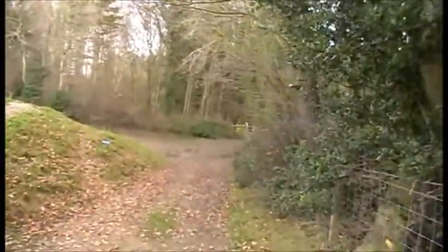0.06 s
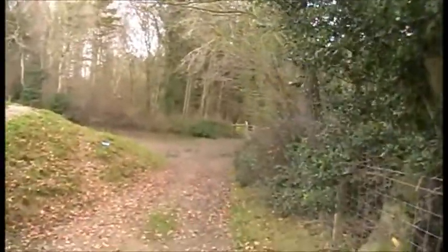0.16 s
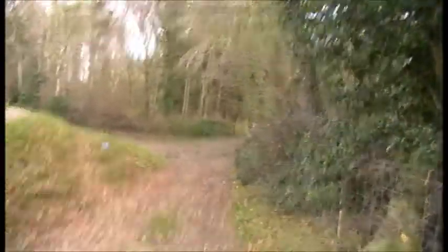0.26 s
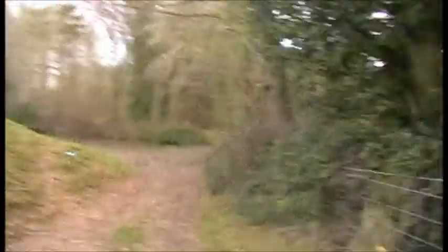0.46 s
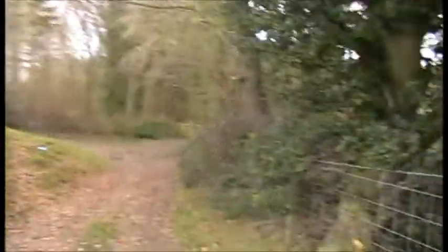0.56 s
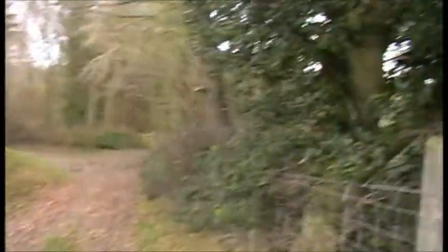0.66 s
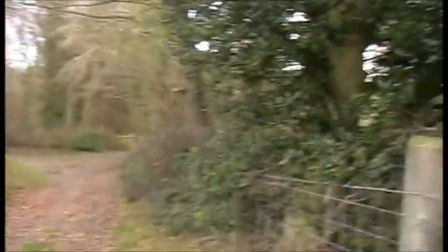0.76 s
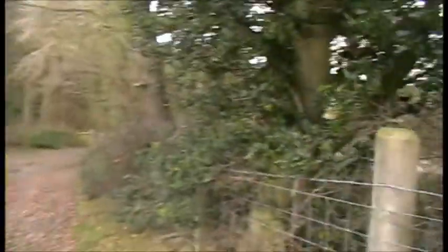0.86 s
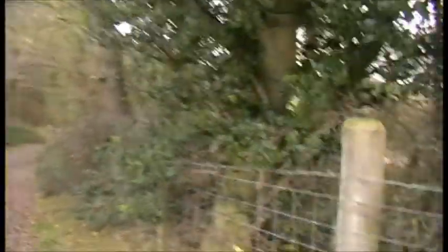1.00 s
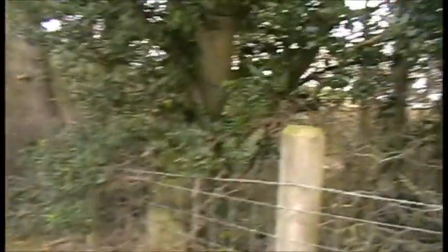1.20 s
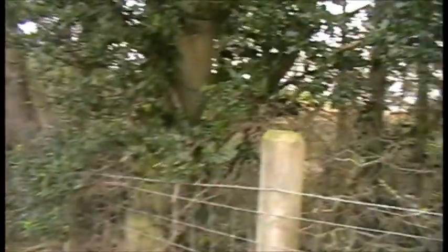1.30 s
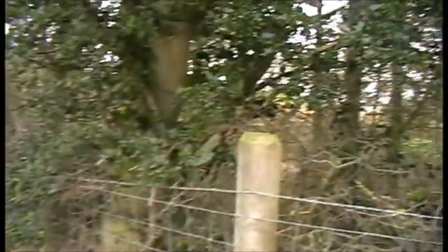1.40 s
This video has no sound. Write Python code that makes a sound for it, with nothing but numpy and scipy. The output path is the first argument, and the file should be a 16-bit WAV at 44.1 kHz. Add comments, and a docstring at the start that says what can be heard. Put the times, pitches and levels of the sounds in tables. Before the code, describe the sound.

A large bird's wings thrash out of stiff evergreen leaves with crackles, twig snaps and dull branch thuds, then beat quickly in clear slapping flaps, fading into quiet woodland air; close outdoor stereo camera microphone, slightly dull treble.

```python
"""Large bird leaving a thicket

A large bird bursts out of an evergreen thicket beside a woodland track and flies off.
Its wings thrash leaves (filtered crackle) and thud against branches (damped sines). Each wingbeat
is a push of air (a windowed cosine) and two feather slaps (damped modes) with quill chirps and rasps.
Leaves settle and twigs tick (noise bursts); the trunks scatter it all back (convolution with decaying
crackle) over the quiet air of the wood (coloured noise).
"""
import sys
import numpy as np
from scipy import signal
from scipy.fft import rfft, irfft
from scipy.io import wavfile

SR = 44100
rng = np.random.default_rng(int(sys.argv[2]) if len(sys.argv) > 2 else 0)


def persist_wave(psi):
    """Save psi, clipped to +-1, as 16-bit WAV."""
    counts = np.round(np.clip(psi, -1, 1) * 32767).astype(np.int16)
    wavfile.write(sys.argv[1], SR, np.atleast_2d(counts).T)


N = 63945  # samples
TIME = np.arange(N) / SR  # s


def undb(db):
    """Logarithmic level: decibels to amplitude gain."""
    return 10 ** (np.asarray(db) / 20)


def unit(x):
    """Normalisation: scale to rms 1."""
    return x / np.sqrt(np.mean(x ** 2) + 1e-20)


def follow(table, at):
    """Linear interpolation of a two-column table."""
    return np.interp(at, *np.array(table).T)


def colour(x, points, share=1):
    """Linear filtering: a spectrum drawn through (Hz, dB) points, straight in log frequency."""
    hz, db = np.array(points, float).T
    f = np.fft.rfftfreq(2 * N, 1 / SR) + 1  # the 1 avoids log of zero
    gain = undb(share * np.interp(np.log(f), np.log(hz), db))
    return irfft(rfft(x, 2 * N) * gain)[..., :N]


def band(x, hz, width):
    """Resonance: one peak whose quality factor is centre over width."""
    b, a = signal.iirpeak(min(hz, SR * .45), hz / width, fs=SR)
    return signal.lfilter(b, a, x)


def since(start):
    """Causality: seconds since an event, zero before it."""
    return np.maximum(TIME - start, 0)


def decay(age, t60):
    """Exponential damping: a fall of 60 dB in t60 seconds."""
    return np.exp(-np.log(1000) * age / t60)


def ring(start, hz, t60):
    """Damped oscillation: a struck, fading vibration."""
    age = since(start)
    return np.sin(2 * np.pi * hz * age) * decay(age, t60)


def crackle(per_s, spread_db, hiss):
    """Random impulse process: dense clicks of scattered size over some hiss; rms 1."""
    size = undb(spread_db * np.minimum(rng.exponential(size=N), 4))
    happens = rng.random(N) < per_s / SR
    clicks = happens * size * rng.choice([-1, 1], N)
    return unit(unit(clicks) + hiss * rng.standard_normal(N))


# Sideways spread of leaves, echoes and air. Each row: frequency in Hz, side gain in dB.
SPREAD = [(100, -12), (300, -6.5), (700, -1), (1500, 1), (8000, -3), (15000, 5)]


def wide(mid, side, side_db):
    """Mid-side stereo: the side signal is added left and subtracted right; the bass stays narrow."""
    return mid + undb(side_db) * colour(side, SPREAD) * np.array([[1], [-1]])


PUSH_HZ, PUSH_WIDTH_S = 148, 0.0028  # nominal pitch and Gaussian width, before the speed varies


def push(at):
    """Pressure pulse: air squeezed and released by a passing wing, never quite at the same speed."""
    u = (TIME - at) * (1 + .1 * rng.standard_normal())
    return np.cos(2 * np.pi * PUSH_HZ * u) * np.exp(-.5 * (u / PUSH_WIDTH_S) ** 2)


# Modes of the slapped wing. Each row: frequency in Hz before detuning, level in dB,
# 60 dB decay time in s before the slap's own scaling.
WING = [(208, -7.5, 0.024), (418.7, -1.5, 0.028), (595.5, 0, 0.024), (745, -1.5, 0.0087)]
SLAP_RISE_S, GROUND_S, GROUND_DB = 0.0021, 0.0055, -17  # ground delay is the mean


def slap(at, t60_scale):
    """Modal vibration and reflection: the wing fills and rings, and the ground returns it."""
    detune = 1 + .07 * rng.standard_normal(len(WING))

    def sound(start):
        """Superposition: the sum of the wing's modes with a soft onset."""
        modes = sum(undb(db) * ring(start, hz * factor, t60 * t60_scale)
                    for (hz, db, t60), factor in zip(WING, detune))
        return (1 - np.exp(-since(start) / SLAP_RISE_S)) * modes

    ground_delay = GROUND_S * (1 + 0.16 * rng.standard_normal())
    return sound(at) + undb(GROUND_DB) * sound(at + ground_delay)


# The quills' pitch drops as the bird eases off. Each row: time in s, pitch factor.
QUILL_PITCH = [(.3, .97), (1, 1.02), (1.22, .89)]
# Nominal starting pitch in Hz, its fall per second, and the flick's time scale in s.
FLICK_HZ, FLICK_FALL_PER_S, FLICK_S = 4005, 56, 0.0012


def flick(at, pitch, rasp_db, rasp_s):
    """Stick-slip friction: quills zip over each other in a falling chirp, then rasp."""
    age = since(at - FLICK_S)
    pitch = pitch * follow(QUILL_PITCH, at)
    start_hz = FLICK_HZ * pitch * (1 + 0.044 * rng.standard_normal())
    hz = start_hz * np.exp(-FLICK_FALL_PER_S * age)
    envelope = np.exp(-((TIME - at - .0005) / FLICK_S) ** 2)
    chirp = np.sin(2 * np.pi * np.cumsum(hz) / SR) * envelope
    grains = crackle(per_s=1400, spread_db=-0.5, hiss=0.36)
    rasp = unit(band(band(grains, 3400 * pitch, 1000), 3550 * pitch, 1600))
    return chirp + undb(rasp_db) * rasp * (1 - np.exp(-age / FLICK_S)) * np.exp(-age / rasp_s)


# Wingbeats. Each row: time of the snap in s, then levels in dB of the air push, first slap,
# first quill flick, snap and second quill flick; the slap and snap are muffled afterwards.
BEATS = [(0.2311, -47, -47, -58, -31, -48), (.2900, -37, -26.5, -56, -22, -29.5),
         (0.3824, -34.5, -49, -32, -18.5, -26), (0.4545, -32.5, -33, -54, -26, -35),
         (0.5456, -33, -21, -36, -21.5, -35.5), (0.618, -34, -26.5, -39, -23, -42.5),
         (.6890, -35.5, -23, -46, -29, -31.5), (.7630, -34, -30, -36.5, -21, -30),
         (.8370, -33, -30, -35, -22, -33), (0.9105, -31.5, -26.5, -37.5, -29.5, -39.5),
         (0.9851, -32, -24, -33.5, -17.5, -27), (1.061, -37.5, -51, -34, -18.5, -32),
         (1.1371, -37.5, -60, -36.5, -27, -34.5), (1.2169, -42.5, -44, -39, -30, -37.5),
         (1.296, -51, -55, -106, -60, -65)]
# Soft feathers muffle the slaps. Each row: frequency in Hz, gain in dB.
MUFFLE = [(680, 0), (900, -2), (1300, -5), (2500, -8)]
SLAP_LEAD_S, PUSH_LEAD_S = .015, 0.01283  # ahead of the snap
REBOUND_S, REBOUND_DB = 0.01932, -4.5  # after the push and relative to it


def wings():
    """Superposition: a push of air and its inverted rebound, a first slap, then the snap."""
    air, slaps, quills = np.zeros((3, N))
    for at, push_db, first_db, first_flick_db, snap_db, flick_db in BEATS:
        pushed = at - PUSH_LEAD_S
        first = at - SLAP_LEAD_S
        air += undb(push_db) * (push(pushed) - undb(REBOUND_DB) * push(pushed + REBOUND_S))
        slaps += undb(first_db) * slap(first, t60_scale=0.65)
        slaps += undb(snap_db) * slap(at, t60_scale=0.91)
        quills += undb(first_flick_db) * flick(first, pitch=.92, rasp_db=-7, rasp_s=0.012)
        quills += undb(flick_db) * flick(at, pitch=1.01, rasp_db=-9, rasp_s=0.016)
    return air + colour(slaps, MUFFLE) + quills


# Level of the feather flutter. Each row: time in s, level in dB.
FLUTTER = [(.3, -55), (.55, -39), (.65, -42.5), (.8, -44), (1.05, -49.5), (1.25, -57.5)]
# Feather resonances. Each row: frequency in Hz, width in Hz, level in dB.
FEATHERS = [(230, 123, -6.5), (568, 387, -1), (3100, 870, -6)]
STROKE_S = 0.015  # Gaussian width of the swell


def flutter():
    """Turbulent flow noise: air rushes through the spread feathers, swelling with each stroke."""
    strokes = sum(np.exp(-.5 * ((TIME - beat[0]) / STROKE_S) ** 2) for beat in BEATS)
    rush = np.zeros(N)
    for hz, width, db in FEATHERS:
        grains = crackle(per_s=900, spread_db=2.5, hiss=0.65)
        rush += undb(db) * unit(band(band(grains, hz, width), hz, width))
    return undb(follow(FLUTTER, TIME)) * strokes * rush


# Wings thrash and brush the foliage. Each row: start in s, attack in s, hold in s, release in s,
# level in dB, treble tilt in dB per octave.
THRASHES = [(0.213, 0.0089, 0.012, 0.027, -37, 0), (.239, 0.013, 0.0053, 0.0072, -21.5, 2.5),
            (.255, 0.0057, 0.006, 0.028, -27.5, 0.5), (0.316, 0.0065, 0.018, .022, -24.5, 0.5),
            (0.3771, 0.0011, 0.0013, 0.018, -28.5, 2.5), (0.4, 0.0014, 0.023, 0.017, -27.5, 0.2),
            (0.447, 0.0026, 0.02, 0.032, -35.5, 0), (.644, .006, .04, 0.022, -51, 5),
            (.694, .008, .016, .025, -42.5, 2), (0.9, .004, .008, .015, -50, 4)]
# Colour of stiff leaves before the tilt. Each row: frequency in Hz, relative gain in dB.
LEAF = [(240, -21), (400, -1), (653, -1.5), (914, -0.5), (1170, -1.5), (1400, -4), (1790, 2.5),
        (2630, -6.5), (2970, -1), (5390, -5.5), (5820, -4.5), (8400, -5), (15500, -8)]


def thrashing():
    """Impulsive contact noise: wings sweep through stiff leaves in bursts of crackle."""
    out = np.zeros((2, N))
    for at, attack, hold, release, db, tilt_db in THRASHES:
        tilted = [(hz, level + tilt_db * np.log2(hz)) for hz, level in LEAF]
        mid, side = (unit(colour(band(crackle(per_s=5000, spread_db=3.5, hiss=0.69), 2950, 12700), tilted))
                     for _ in range(2))
        rise = np.minimum(since(at) / attack, 1)
        fall = np.exp(-since(at + attack + hold) / release)
        out += undb(db) * rise * fall * wide(mid, side, side_db=-8)
    return out


# Branches knock and thud. Each row: start in s, level in dB before the soft onset,
# frequency in Hz, 60 dB decay time in s.
THUDS = [(.0505, -31, 735, 0.016), (.053, -35.5, 343, 0.023), (.058, -47.5, 131, 0.14),
         (0.239, -17.5, 303, 0.036), (.242, -31, 120, 0.072), (0.264, -20.5, 205, 0.063),
         (.3215, -16, 152.4, 0.029), (0.332, -18.5, 195, 0.018), (.378, -33.5, 234, 0.12),
         (.4025, -11.5, 170, 0.019), (0.414, -18, 393, 0.024), (0.422, -18, 236, 0.025),
         (1.357, -26, 1555, 0.015)]


def branches():
    """Damped resonance: knocked wood rings briefly, loudest as the bird forces its way out."""
    return sum(undb(db) * ring(at, hz, t60) * (1 - np.exp(-since(at) / 0.0022))
               for at, db, hz, t60 in THUDS)


# Twigs tick and snap. Each row: start in s, peak level in dB, frequency in Hz, width in Hz,
# time constant of the fade in s.
TWIGS = [(.2594, -13, 7500, 11000, .0002), (.3362, -16, 5000, 9000, .0003), (.3782, -13, 7000, 15000, .001),
         (.903, -30, 12500, 7000, .003), (1.0925, -37, 8000, 10000, .0008), (1.3584, -37, 2500, 2000, .005),
         (1.3972, -33, 3300, 3500, .002)]


def twigs():
    """Impulsive fracture: short fading noise cracks, each in its own frequency range."""
    out = np.zeros(N)
    for at, db, hz, width, fade in TWIGS:
        age = since(at)
        burst = rng.standard_normal(N) * (age > 0) * np.exp(-age / fade)
        crack = band(band(burst, hz, width), hz, width)
        out += undb(db) * crack / np.abs(crack).max()
    return out


# Level of the rustling leaves. Each row: time in s, level in dB.
RUSTLE = [(0, -56.5), (.03, -63.5), (.15, -65), (.18, -54.5), (.22, -54.5), (.3, -71), (.48, -59),
          (0.532, -45), (.63, -44.5), (.71, -40.5), (.76, -45.5), (.87, -48), (.97, -46), (1.1, -48),
          (1.202, -54), (1.32, -54), (1.412, -48.5), (1.45, -54.5)]
# Colour of the rustle. Each row: frequency in Hz, relative gain in dB.
RUSTLE_COLOUR = [(290, -21), (500, -15), (611, -10), (901, -7.5), (1150, -13), (1390, -10.5), (3850, -14),
                 (4910, -18), (7780, -17.5), (15500, -19)]


def rustle():
    """Random contact noise: disturbed leaves keep brushing and settle."""
    mid, side = (unit(colour(band(crackle(per_s=1100, spread_db=3.5, hiss=0.98), 2440, 13900), RUSTLE_COLOUR))
                 for _ in range(2))
    return undb(follow(RUSTLE, TIME)) * wide(mid, side, side_db=-7)


WOOD_T60_S, WOOD_DB = 1, -7.5  # scattered tail
NEAR_S, NEAR_DB = 0.011, -12.5  # quick reflections: time constant and level
TREBLE_HZ, TREBLE_T60_S = 5000, 0.63  # leaves soak up the echoes above this pitch sooner


def echoes():
    """Diffuse reverberation: quick returns from ground and thicket, then a tail from the trunks."""
    near = np.exp(-TIME / NEAR_S) * (TIME > .004)
    far = decay(TIME, WOOD_T60_S) * (1 - np.exp(-TIME / 0.0081))
    shape = (undb(NEAR_DB) * unit(near) + undb(WOOD_DB) * unit(far)) / np.sqrt(N)
    mid = crackle(per_s=2500, spread_db=3, hiss=0.47)
    side = crackle(per_s=2500, spread_db=5, hiss=0.44)
    scatter = shape * wide(mid, side, side_db=-2.5)
    dull = colour(scatter, [(TREBLE_HZ / 2, 0), (TREBLE_HZ, -3), (TREBLE_HZ * 2, -20)])
    extra_damping = max(1 / TREBLE_T60_S - 1 / WOOD_T60_S, 0)
    return dull + (scatter - dull) * np.exp(-np.log(1000) * TIME * extra_damping)


# Colour of the echoes from the trunks. Each row: frequency in Hz, gain in dB.
WOOD = [(60, -2), (200, 0), (550, 2), (1200, -7.5), (3300, -4), (8000, -10), (15000, -2)]


def woodland(x, count=12):
    """Convolution: the bird moves, so each stretch of its flight has its own pattern of echoes."""
    place = np.linspace(0, count - 1, N)
    wet = np.zeros((2, N))
    for k in range(count):
        stretch = x * np.sqrt(np.maximum(1 - np.abs(place - k), 0))  # equal-power crossfade
        wet += signal.fftconvolve(stretch[None], echoes(), axes=1)[:, :N]
    return colour(wet, WOOD)


# Colour of the quiet air. Each row: frequency in Hz, relative gain in dB.
AIR = [(26, -39), (45, 4.5), (114, 3), (296, 1.5), (506, -7.5), (712, -9), (1890, -10.5), (2090, -17),
       (3010, -18.5), (7090, -20.5), (14400, -52), (15500, -22)]
AIR_DB = -58.5  # level of the middle signal


def quiet_air():
    """Stationary noise: the steady, wide background of the wood."""
    mid, side = (unit(colour(rng.standard_normal(N), AIR)) for _ in range(2))
    return undb(AIR_DB) * wide(mid, side, side_db=0.5)


# Lean of the stereo image. Each row: frequency in Hz, lean to the left in dB before the
# two channels take their shares.
LEAN = [(60, 7.5), (200, 8), (380, 5.5), (700, 3.5), (1290, 0.7), (2380, -2), (4400, -4.5), (8100, -0.5),
        (15000, -.7)]


def scene():
    """Interaural level difference: the bass leans left, the upper middle right."""
    direct = wings() + flutter() + branches() + twigs() + thrashing() + rustle()
    left, right = direct + woodland(direct.mean(axis=0)) + quiet_air()
    return np.array([colour(left, LEAN, share=0.57), colour(right, LEAN, share=-0.35)])


# The microphone's treble. Each row: frequency in Hz, gain in dB.
MIC = [(9000, 0.5), (12000, -5.5), (15500, -11.5)]
TOP_HZ = 15800


def record(dry):
    """Band limiting: the camera dulls the treble and cuts the deepest rumble and the top."""
    rumble_cut = signal.butter(N=3, Wn=36, btype="high", fs=SR, output="sos")
    top_cut = signal.ellip(10, .2, 80, TOP_HZ, fs=SR, output="sos")
    thin = signal.sosfilt(rumble_cut, colour(dry, MIC))
    return signal.sosfilt(top_cut, thin)


dry = scene()
out = record(dry)
persist_wave(out)
```